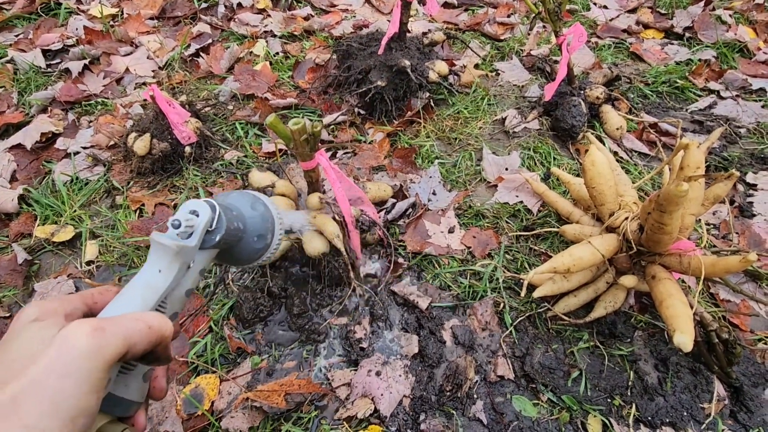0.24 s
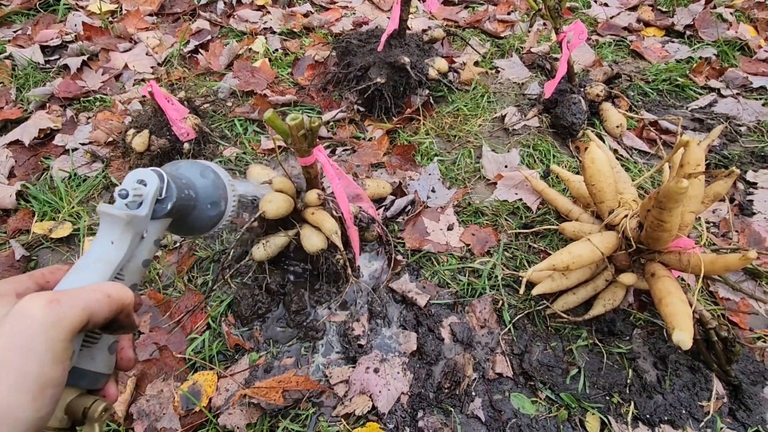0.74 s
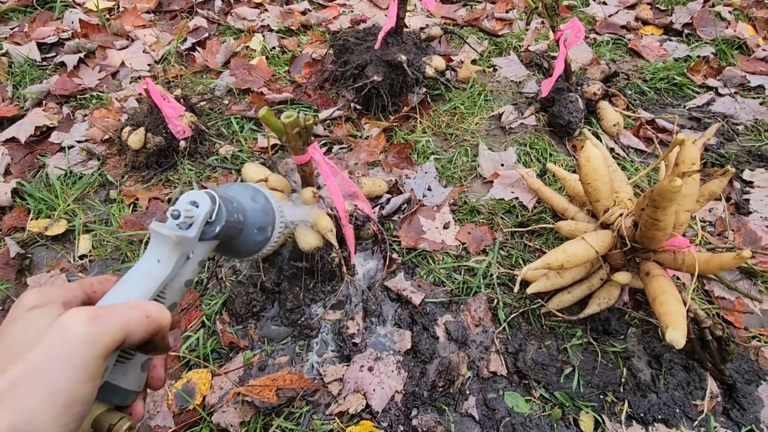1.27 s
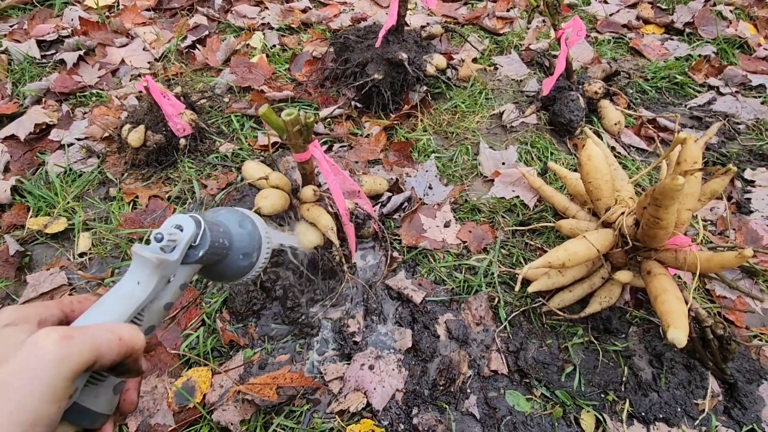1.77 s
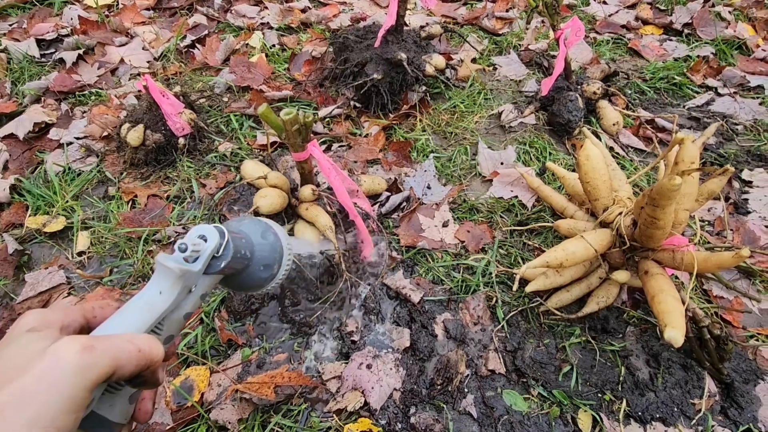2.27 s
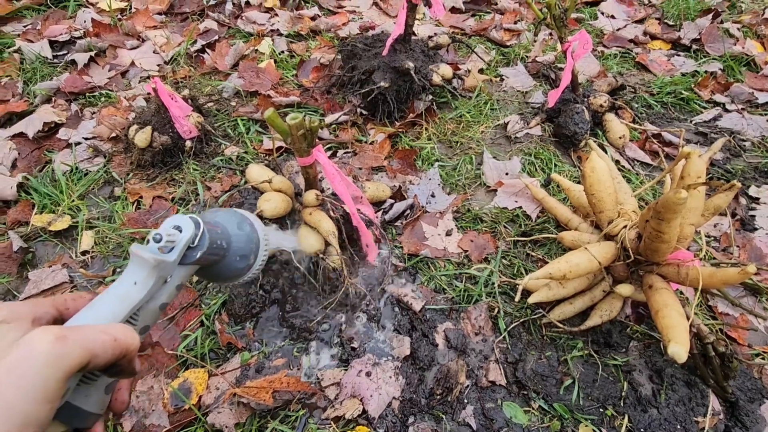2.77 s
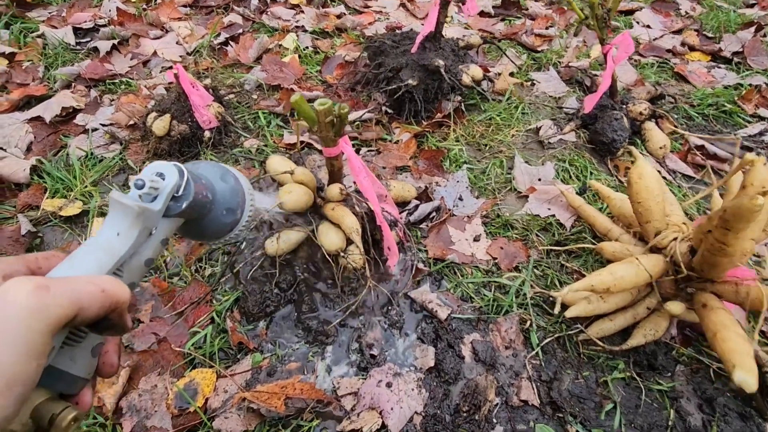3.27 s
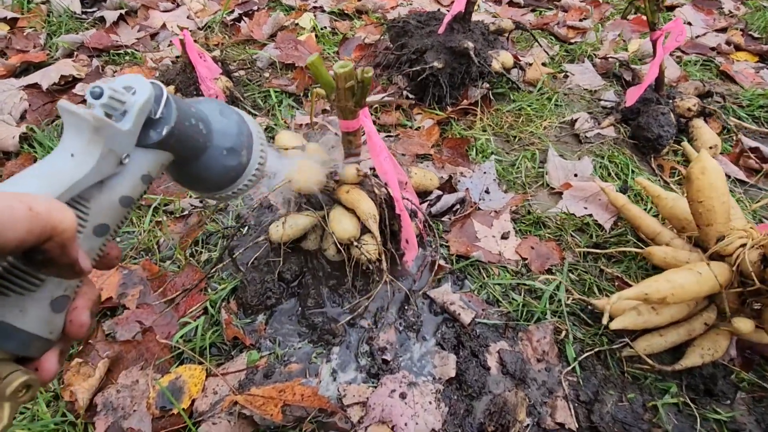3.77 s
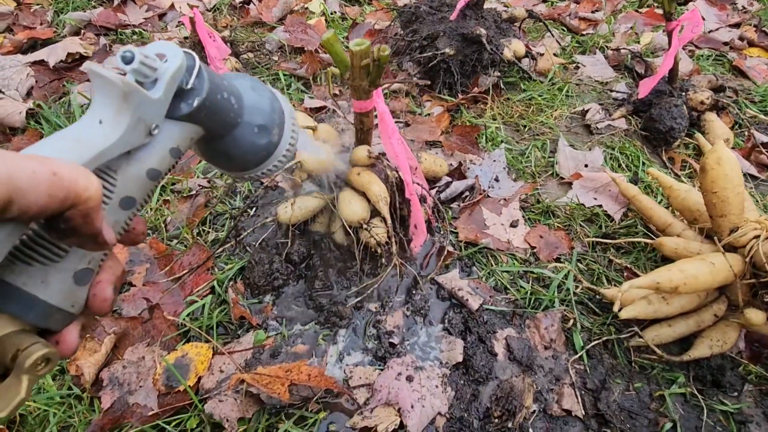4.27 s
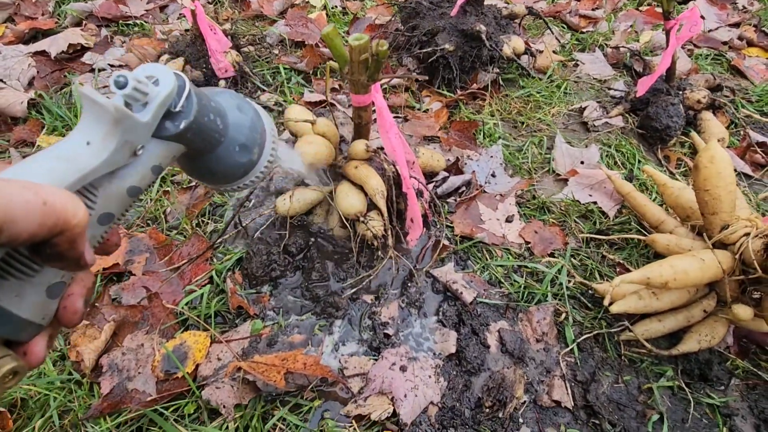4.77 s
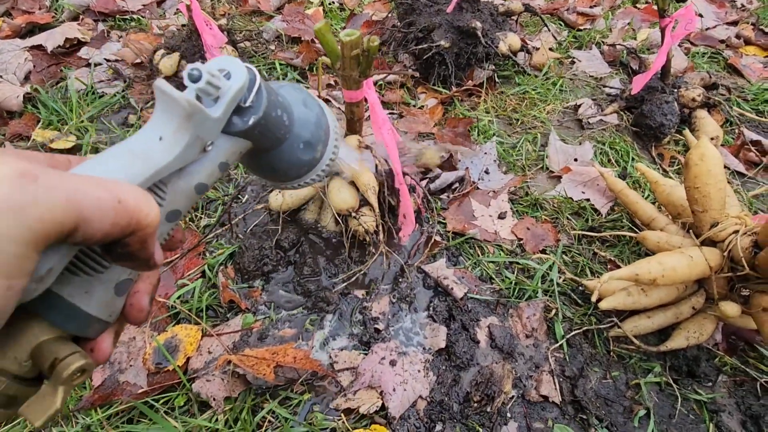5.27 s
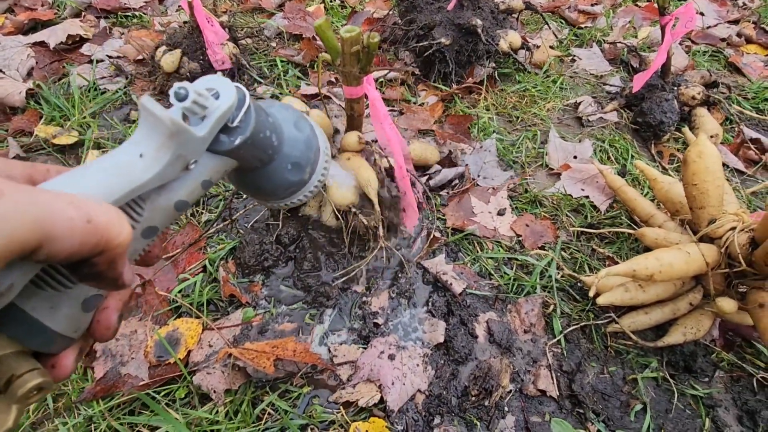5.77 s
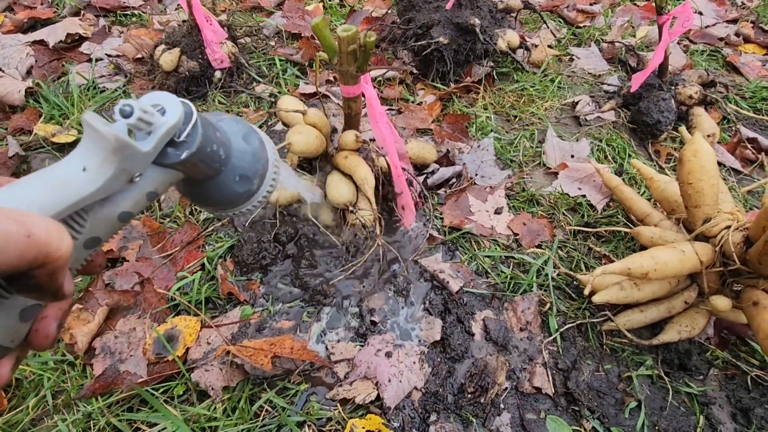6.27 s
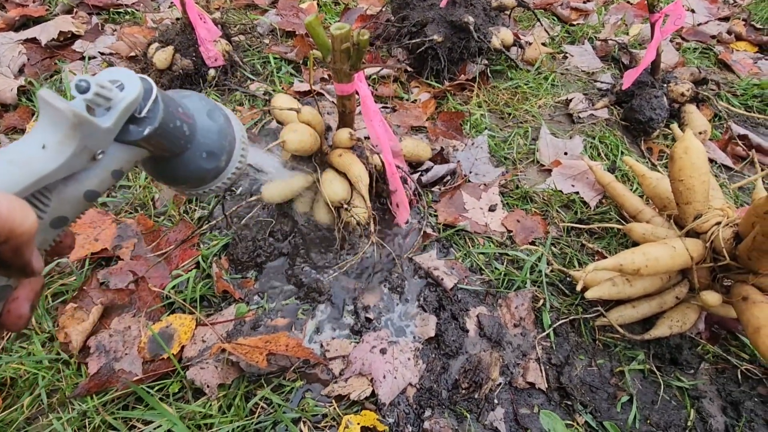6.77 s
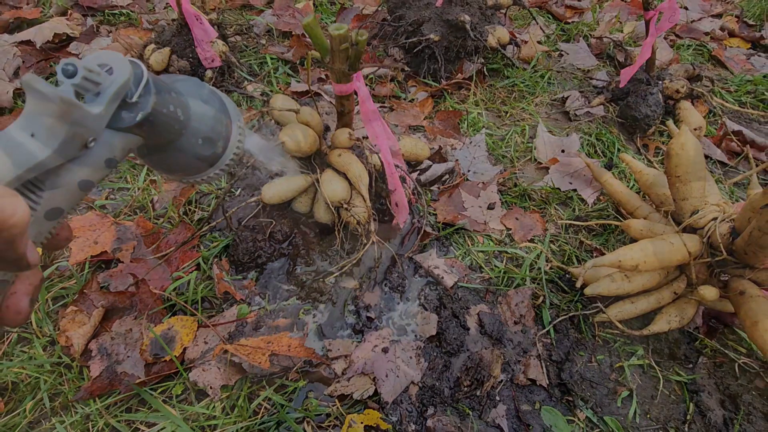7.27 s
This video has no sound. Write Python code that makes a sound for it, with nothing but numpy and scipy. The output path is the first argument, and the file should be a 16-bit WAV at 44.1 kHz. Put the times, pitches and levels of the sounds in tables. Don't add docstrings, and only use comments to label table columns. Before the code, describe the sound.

From 0 s a garden hose sprays tubers on wet soil close to the microphone: a bright, grainy hiss torn into tiny spatters, with a soft puddle gurgle below. It thins briefly near 0.8 s, then sharp spits snap around 1.0-1.1 and 1.4-1.9 s. A clear bubble plop rings near 1.5 s, with rounder ones around 2.4-2.6 s. About 3-3.6 s the spray weakens while the microphone leans nearer and its colour shifts. From 3.8 s it strengthens, with a dense crackle of spits to 4.4 s, dips near 4.8 s, and returns crisply at 5 s. Between 5.9 and 6.6 s hard spits mix with puddle slaps and a quick cluster of high plops. Faint wind and far traffic rumble swell most near 6.5 s; a thin hum is barely there. After 7 s the spray fades to 7.5 s. Open outdoor space, close stereo, no reverberation.

```python
import sys
import numpy as np
from scipy import signal
from scipy.fft import rfft, irfft, next_fast_len
from scipy.io import wavfile
from scipy.ndimage import uniform_filter1d

SR = 44100
rng = np.random.default_rng(int(sys.argv[2]) if len(sys.argv) > 2 else 0)


def transcribe(signal):
    frames = np.atleast_2d(signal).T
    limited = np.clip(frames, -1, 1)
    pcm = np.round(limited * 32767).astype(np.int16)
    wavfile.write(sys.argv[1], SR, pcm)


def volts_from_db(level):
    exponent = np.asarray(level, float) / 20
    return 10 ** exponent


N = 331632
STEPS = np.arange(0, N / SR, .005)


def unit(x):
    return x / np.sqrt(np.mean(x ** 2) + 1e-20)


def along(points, hz):
    f, v = np.transpose(points)
    return np.interp(np.log(hz + 1), np.log(f + 1), v)


def curves(rows):
    s, *columns = np.transpose(rows)
    return [np.interp(np.arange(N) / SR, s, column) for column in columns]


def smooth(rows):
    return [np.interp(np.arange(N) / SR, STEPS, row) for row in rows]


def bumps(rows):
    tents = [np.outer(rise, np.clip(1 - abs(STEPS - s) / half, 0, 1)) for s, half, *rise in rows]
    return smooth(sum(tents))


def wobble(rate):
    return np.interp(np.arange(N) * rate / SR, np.arange(N // 20), rng.standard_normal(N // 20))


def filtered(x, response):
    m = next_fast_len(N + 8192)
    return irfft(rfft(x, m) * response(np.fft.rfftfreq(m, 1 / SR)), m)[..., :N]


def band(hz, low_hz, high_hz):
    return 1 / np.sqrt((1 + (low_hz / (hz + 1)) ** 30) * (1 + (hz / high_hz) ** 30))


def parts(x, *bands):
    hz, t, z = signal.stft(unit(x), SR, nperseg=512)
    at = np.minimum(t * SR, N - 1).astype(int)
    gain = sum(unit(band(hz, low, high))[:, None] * volts_from_db(db[at]) for low, high, db in bands)
    return signal.istft(z * gain, SR, nperseg=512)[1][:, :N]


def torn(size, patch_db, spurt_db, surge_db, drops, bins):
    z = signal.stft(rng.standard_normal((2, N)), nperseg=size)[2]
    shape = z.shape[1:]
    field = uniform_filter1d(rng.standard_normal(shape), size=bins, axis=0)
    field = uniform_filter1d(field, size=2, axis=1)
    burst = (rng.random(shape) < .003) * rng.random(shape)
    for _ in range(2):
        burst = uniform_filter1d(burst, size=bins, axis=0)
    patches = volts_from_db(patch_db * unit(field)) + drops * burst * bins
    pair = signal.istft(z * patches, nperseg=size)[1][:, :N]
    surge = wobble(70) + 0.76 * wobble(15)
    return pair * volts_from_db(spurt_db * wobble(350) + surge_db * surge)


def grains(s, gain, hz, life, rise):
    t = np.arange(700) / SR
    u = t / life[:, None]
    phase = 2 * np.pi * hz[:, None] * t * (1 + rise * np.minimum(u, 4) / 8)
    wave = gain[:, None] * u * np.exp(1 - u) * np.sin(phase)
    at = (s * SR).astype(int)[:, None] + np.arange(700)
    return np.bincount(at.ravel(), wave.ravel(), N + SR)[:N]


# f/Hz, level/dB per Hz
RUMBLE_SPECTRUM = [(13, -37), (22, -0.5), (43, -1), (65, 3.5), (200, -11.5), (260, -38), (440, -120)]
# t/s, level/dB
HUM_LEVEL = [(0, -75), (2.9, -81), (3.2, -62.5), (6.8, -73), (7.52, -78)]
# t/s, half length/s, rumble rise/dB, murmur rise/dB
WIND_GUSTS = [
    (0.45, 0.38, -1, 7),
    (2.76, 0.22, 0, 1),
    (3.06, 0.16, -5, 7.5),
    (4.23, 0.23, 3.5, 9),
    (4.8, 0.27, 0, 6),
    (5.8, 0.94, 3.5, 0.5),
    (6.55, 0.45, 10, 5.5),
    (7.05, 0.37, 4.5, 2.5),
]
CALM_DB, HUM_HZ = -56.5, 340


def air():
    low = unit(filtered(rng.standard_normal((2, N)), lambda hz: volts_from_db(along(RUMBLE_SPECTRUM, hz))))
    rumble = np.array([1.17 * (low[0] + .21 * low[1]), .85 * (low[0] - .2 * low[1])])
    rumble_db = CALM_DB + bumps(WIND_GUSTS)[0] * (1 + .25 * wobble(8))
    hum = np.sin(2 * np.pi * np.cumsum(HUM_HZ + 1.59 * wobble(2)) / SR)
    return volts_from_db(rumble_db) * rumble + volts_from_db(curves(HUM_LEVEL)[0]) * hum


# t/s, level/dB, coarseness of the drops/dB
JET_STRENGTH = [(0.0, -30.5, -6.0), (0.4, -34, -3), (0.55, -30.5, -11.5), (0.84, -42.5, 1),
                (1.11, -31.5, -0.5), (1.69, -32.0, -6), (2.76, -33.5, -8.5), (3.0, -34.0, 0),
                (3.3, -39.0, -4), (3.73, -35.5, -6.5), (3.78, -31.0, -10.5), (4.23, -30, -10.0),
                (4.63, -34, -1), (4.8, -38.5, -1.0), (4.94, -36.5, -10), (4.98, -30.5, -11.5),
                (6.69, -32, -6.5), (7.52, -45.0, -3.5)]
# t/s, half length/s, fine spray/dB, coarse spray/dB
ROOT_GLANCES = [(0.68, 0.06, -2, 4.5), (0.8, 0.07, 6, 0), (1.01, 0.12, 2, -7), (1.17, 0.067, -3.5, -5),
                (1.31, 0.16, 1.0, -7.5), (1.67, 0.12, -1.5, -4), (1.96, 0.06, 2, 0),
                (2.0, 0.058, 0.5, -3.5), (2.12, 0.05, -1, -6.5), (2.76, 0.075, 2.5, 3.5),
                (3.4, 0.05, 3, 4.5), (3.54, 0.08, 5, 3.5), (3.75, 0.062, -4.5, 3.0), (4.64, 0.06, 3, 3.5),
                (5.02, 0.23, -2, 6), (5.22, 0.09, 3, 0), (5.52, 0.042, 2.5, 7.5), (5.79, 0.1, -4.5, 5.5),
                (5.99, 0.051, 3, 0.5), (6.13, 0.04, -0.5, 5.5), (6.2, 0.068, -2, 1.5), (6.42, 0.17, 1, 3.5),
                (6.97, 0.16, -3.5, 2), (7.17, 0.099, -0.5, 5)]


def jet():
    strength_db, coarse_db = curves(JET_STRENGTH)
    fine_up, coarse_up = bumps(ROOT_GLANCES)
    water = torn(size=64, patch_db=2.5, spurt_db=1.15, surge_db=.7, drops=2.4, bins=7)
    fine = (6100, 17000, strength_db + fine_up + 1.33)
    coarse = (2650, 6100, strength_db + coarse_db + coarse_up + 4.0)
    return parts(water, fine, coarse)


# t/s, length/s, slap level/dB, gurgle over slap/dB
PUDDLE_CROSSINGS = [(0.027, 0.29, -49, -6), (0.443, 0.046, -47, -13.5), (1.097, 0.16, -51, -9.5),
                    (1.456, 0.22, -51.5, -6), (1.78, 0.37, -50, -7), (2.252, 0.016, -45.5, -15.5),
                    (2.37, 0.029, -45, -2.5), (2.48, 0.24, -46.5, 0.5), (2.86, 0.2, -45.5, -22),
                    (3.036, 0, -47.5, -3), (3.103, 0.04, -61.5, 14), (3.43, 0.28, -55.0, -4),
                    (3.98, 0.23, -49.5, -7.5), (4.29, 0.23, -50.5, -7.5), (4.66, 0, -41, -1.5),
                    (4.756, 0.28, -50.5, 4), (5.176, 0.21, -56, -1.5), (5.518, 0.22, -51, -3.5),
                    (5.87, 0.0, -43.5, -3.5), (5.96, 0.0, -44.5, -11), (6.11, 0.23, -44.5, -11),
                    (6.398, 0.092, -41.5, -6.5), (6.657, 0.22, -53, 0), (7.0, 0.047, -43.5, -9),
                    (7.03, 0.02, -49.5, 0), (7.133, 0.14, -44, -8.5), (7.29, 0.09, -49.5, -5.5)]
DIP_IN_S, DRAIN_S = 0.12, 0.069
TRICKLE_DB, TRICKLE_GURGLE_DB = -53, -57


def wetness():
    power = volts_from_db([[2 * TRICKLE_DB], [2 * TRICKLE_GURGLE_DB]])
    for s, length, db, deep_db in PUDDLE_CROSSINGS:
        enter = np.clip((STEPS - s) / DIP_IN_S + 1, 0, 1)
        drain = np.exp(-np.maximum(STEPS - s - length, 0) / DRAIN_S)
        power = power + volts_from_db([[2 * db], [2 * (db + deep_db)]]) * (enter * drain) ** 2
    return smooth(10 * np.log10(power))


# t/s, peak level/dB, f/Hz
CLEAR_PLOPS = [(0.106, -22, 2100), (1.502, -35, 2200), (1.534, -19, 2120), (1.565, -27, 2230),
               (1.782, -28, 1360), (2.357, -21.5, 1230), (2.443, -27, 1910), (2.616, -18, 1240),
               (2.895, -34, 2140), (3.059, -25, 1340), (3.124, -30, 716), (3.668, -40, 1910),
               (5.04, -35, 627), (5.521, -34, 1950), (5.957, -34, 1900), (6.115, -24.5, 1810),
               (6.243, -23.5, 1860), (6.263, -22, 1960), (6.289, -20, 2010), (6.35, -37, 2040),
               (6.391, -21, 1870), (6.966, -26, 1860)]
# t/s, share/0-1
LEAN_IN = [
    (0, 0),
    (3.05, 0),
    (3.4, 1),
    (7.52, 1),
]
MURMUR_DB = -62.5


def pool():
    slap_db, gurgle_db = wetness()
    lean = curves(LEAN_IN)[0]
    water = unit(torn(size=256, patch_db=1.5, spurt_db=0.36, surge_db=1.0, drops=0.86, bins=6))
    draw = rng.random((2, 900, 3))
    for side, (when, pitch, size) in zip(water, draw.transpose(0, 2, 1)):
        hz = 750 * 3.5 ** pitch
        bubbles = grains(when * N / SR, (size + 0.02) ** -.4, hz, 2.78 / hz, rise=0.27)
        side += 0.13 * unit(bubbles)
    slap = (1140, 2650, slap_db + 10.0 - 1.14 * lean)
    gurgle = (440, 1140, gurgle_db + 13.0 - 4.0 * lean)
    murmur = (160, 440, MURMUR_DB + bumps(WIND_GUSTS)[1] + 18.5 - 4 * lean)
    s, db, hz = np.transpose(CLEAR_PLOPS)
    plop = grains(s, volts_from_db(db + 2.5), hz, 1.1 / hz + 0.00071, rise=0.17)
    return parts(water, slap, gurgle, murmur) + np.array([plop, 0.1 * plop])


# t/s, peak level/dB, centre f/Hz
LOUD_SPITS = [(0.0547, -18, 8320), (0.995, -13, 7630), (1.1007, -11, 7240), (1.4508, -12, 4670),
              (1.5943, -9.5, 11500), (1.9385, -11.5, 5520), (3.4062, -13, 8910), (3.8774, -8, 13200),
              (3.9998, -9, 13100), (4.1155, -12, 11500), (4.1647, -9.5, 7550), (4.182, -8, 14000),
              (4.222, -16, 7560), (4.239, -10, 13200), (4.294, -11, 11500), (4.3131, -14, 7600),
              (4.3425, -12.5, 7540), (4.9826, -14, 5600), (5.023, -8, 5670), (5.1554, -11, 8010),
              (5.2215, -13, 7570), (5.6333, -8, 14500), (5.9813, -9, 14600), (6.0496, -11, 9090),
              (6.2617, -9, 8240), (6.356, -11.5, 8050), (6.4113, -8.5, 5570), (6.4665, -10, 7750),
              (6.507, -11, 14300), (6.6253, -13, 5510)]
# t/s, peak level/dB, centre f/Hz
LESSER_SPITS = [(0.1376, -17, 14500), (0.165, -18, 12900), (0.4614, -16, 7540), (0.5252, -17, 7620),
                (0.7522, -20, 5060), (1.1598, -19, 5350), (1.2166, -16, 7430), (1.6616, -18, 11500),
                (1.8542, -15, 7510), (1.8961, -15, 8450), (2.0502, -18, 5050), (2.0752, -17, 12700),
                (2.1241, -19, 8610), (2.2682, -19, 7800), (2.7487, -16, 7350), (2.7844, -16, 8780),
                (2.8184, -18, 5590), (2.8868, -21, 5170), (3.0205, -18, 4660), (3.1527, -20, 5500),
                (3.3762, -21, 5420), (3.6506, -17, 7280), (3.7748, -15, 7360), (3.8944, -16, 7710),
                (3.9744, -14, 7260), (4.0477, -16, 7990), (4.2038, -10, 15000), (4.2664, -16, 7400),
                (4.3734, -16, 7640), (4.3874, -16, 8450), (4.5834, -17, 5610), (4.6089, -21, 6580),
                (4.6089, -15, 5530), (4.6404, -16, 3620), (4.8304, -21, 5510), (5.0419, -17, 5590),
                (5.2334, -14, 7470), (5.2414, -14, 7540), (5.2544, -15, 7920), (5.3632, -17, 13400),
                (5.4154, -16, 7490), (5.443, -15, 13300), (5.5218, -11, 7650), (5.5994, -16, 8180),
                (5.7044, -17, 8190), (5.9, -18, 12200), (5.9409, -15, 7630), (6.0013, -11, 7580),
                (6.125, -15, 8370), (6.3784, -16, 4870), (6.4274, -14, 4880), (6.5234, -14, 14200),
                (6.5894, -13, 14400), (6.6787, -15, 7860), (6.7254, -18, 7620), (6.786, -15, 7460),
                (6.9227, -21, 5380), (6.979, -20, 5320), (7.1367, -22, 4800), (7.1886, -22, 5460)]
SPIT_MS, LESSER_DB = 1.62, 1
SMALL_SPIT_DB, SMALL_LOW_HZ, SMALL_HIGH_HZ = 12, 4900, 14800


def spits():
    out, t = np.zeros((2, N + SR)), np.arange(512) / SR
    hz = np.fft.rfftfreq(512, 1 / SR)
    when, pitch, size = rng.random((40, 3)).T
    jet_db = curves(JET_STRENGTH)[0][(when * N).astype(int)]
    small_db = jet_db + SMALL_SPIT_DB + 6 * (size - .5)
    small = zip(when * N / SR, small_db, SMALL_LOW_HZ * (SMALL_HIGH_HZ / SMALL_LOW_HZ) ** pitch)
    lesser = [(s, db + LESSER_DB, centre_hz) for s, db, centre_hz in LESSER_SPITS]
    u = t * 1000 / (0.33 * SPIT_MS)
    for s, db, centre_hz in [*LOUD_SPITS, *lesser, *small]:
        hump = np.exp(-(np.log((hz + 1) / centre_hz) / 0.19) ** 2)
        colour = (0.42 + hump) * band(hz, 2400, 15500)
        burst = irfft(rfft(rng.standard_normal((2, 512))) * colour) * u * np.exp(1 - u)
        burst = burst / abs(burst).max(axis=1, keepdims=True)
        gain = volts_from_db(db - 1.5 + np.array([[0], [-8]]))
        out[:, round(s * SR):][:, :512] += gain * burst
    return out[:, :N]


# f/Hz, level/dB per Hz
LEFT_HELD_BACK = [(260, -20), (340, -15.5), (430, -20.5), (650, -8), (860, -14.5), (1160, -6),
                  (1680, -10.5), (1980, -1.5), (2150, -4.5), (2450, 0.5), (2670, -11)]
RIGHT_HELD_BACK = [(260, -18), (340, -14), (470, -20), (650, -9.5), (730, -5.5), (1080, -18.5),
                   (1160, -11.5), (1590, -5), (1770, -11.5), (2330, 3), (2670, -10.5)]
# f/Hz, level/dB per Hz
LEFT_LEANING = [(260, -13.5), (340, -14), (430, -12.5), (560, -5), (780, -15.5), (900, -8), (1120, -9.5),
                (1460, 0), (1590, -6), (1940, -4), (2670, -1.5)]
RIGHT_LEANING = [(260, -13), (340, -11.5), (430, -17.5), (560, -7), (690, -7.5), (820, -17.5), (1160, -3),
                 (1380, -10.9), (1680, -8), (1980, -1.5), (2670, 0.5)]
# f/Hz, level/dB per Hz
LEFT_TREBLE = [(2710, -1), (3100, 2.23), (3750, -2), (4130, 3.5), (5120, 1.3), (5560, 5), (5900, -3.5),
               (6800, 1), (7620, 7), (9780, 1.5), (11460, 6), (12100, 2), (14430, 6), (15460, 2.5)]
RIGHT_TREBLE = [(2710, -3), (3270, -2), (3700, -3), (3920, -11), (4150, -1.5), (4520, 2), (5640, -5.5),
                (6160, -11.5), (7620, -0.1), (8530, -1), (9430, -10.0), (9600, -1), (10940, -3),
                (11800, 1.5), (13440, 0.5), (15460, -4)]
# f/Hz, width/Hz, held back level/dB, leaning in level/dB
SOIL_ECHO = [
    (454, 38, -12.5, -4),
    (984, 158, -8.5, 1.5),
    (1230, 168, -1.5, -7.5),
]
# f/Hz, coherence/0-1
COHERENCE = [(40, 1), (600, 0.89), (1100, 0.53), (1700, 0.7), (2250, 0.78), (2650, 0.81), (3150, 0.76),
             (3600, 0.84), (3950, 0.6), (4400, 0.82), (5100, 0.47), (6200, 0.2), (8050, 0.58), (9430, 0.46),
             (11370, 0.7), (13000, 0.12)]
# f/Hz, lag/rad
BODY_LAG = [(40, 0), (600, .5), (1000, 1), (1250, 1.55), (1850, 1.4), (2150, 1.95), (2700, 3.14),
            (3350, 4.6), (4350, 9.5), (4950, 11), (5680, 12), (6460, 17.5), (9260, 20.5), (11800, 23.5)]
# t/s, extra right lag round the near side/us, far side/us,
# spread of the water near/ratio, far/ratio (wider is less alike)
JET_AIM = [(0, 13, -12, 1.0, 1.33), (.3, 13, 10, 1.1, 1.0), (.5, 13, 23, 1.1, 1.05), (.58, 50, 44, .8, 1.3),
           (.92, 52, 50, .8, 1.35), (1.0, 40, 42, 1.4, 1.35), (1.1, 14, 5, .95, 1.2),
           (1.8, 12, 6, 1.0, 1.28), (2.0, 8, 20, 1.1, 1.33), (2.2, -12, -10, 1.0, 1.32),
           (2.36, -42, -6, .85, 1.25), (2.66, -48, -14, .9, 1.35), (2.74, 0, 2, 1.1, 1.3),
           (3.0, 20, 32, 1.45, 1.33), (3.2, 28, 40, 1.2, 1.3), (3.45, 42, 30, 1.0, 1.33),
           (3.62, 25, 14, 1.1, 1.35), (3.8, 0, -8, 1.15, .95), (4.0, -12, -11, .95, .9),
           (4.33, -18, -9, .9, .78), (4.6, 0, -11, 1.2, .8), (4.75, 0, -8, 1.2, 1.15),
           (5.05, 0, -10, 1.15, .78), (5.2, -12, -20, .85, .82), (5.4, -40, -38, .8, .9),
           (5.48, -30, -38, 1.3, 1.15), (5.6, -18, -38, .85, .82), (5.72, -22, -40, .9, .82),
           (5.8, -24, -35, 1.4, 1.25), (5.93, -22, -30, .8, .82), (6.05, -5, -15, .9, .85),
           (6.2, 22, -2, .85, .82), (6.4, 6, -9, .62, 1.1), (6.66, 12, 5, .65, 1.25),
           (6.85, 8, -8, 1.1, .85), (7.0, 28, 30, 1.15, 1.32), (7.25, 42, 40, 1.1, 1.35),
           (7.45, 15, 46, .9, 1.35)]
# t/s, left over right level/dB
TREBLE_BALANCE = [(0, -.7), (.7, -.3), (1.2, -1), (2.7, -.7), (3.2, 1.1), (4.2, .9), (4.7, 2), (5.2, -.4),
                  (5.7, -.6), (6.2, .3), (6.8, .6), (7.3, 2.3)]
ROUND_HZ = 3750


def ports(pair):
    hz, t, (a, b) = signal.stft(pair, SR, nperseg=1024)
    hz = hz[:, None]
    s, *aim = np.transpose(JET_AIM)
    near_us, far_us, near_spread, far_spread = (np.interp(t, s, column) for column in aim)
    round_far = 1 / (1 + (ROUND_HZ / (hz + 1)) ** 20)
    lag_us = near_us + round_far * (far_us - near_us)
    spread = near_spread + round_far * (far_spread - near_spread)
    turn = np.arccos(np.clip(along(COHERENCE, hz), 0, 1)) / 2
    turn = np.minimum(turn * spread, np.pi / 4)
    lean = np.interp(t, *np.transpose(LEAN_IN))
    soil_db = 0
    for at, width, back_db, close_db in SOIL_ECHO:
        soil_db = soil_db + (back_db + lean * (close_db - back_db)) * np.exp(-((hz - at) / width) ** 2)

    def colour(back, close, treble):
        return volts_from_db(soil_db + (1 - lean) * along(back + treble, hz) + lean * along(close + treble, hz))

    late = along(BODY_LAG, hz) + 2 * np.pi * hz * lag_us / 10 ** 6
    left = colour(LEFT_HELD_BACK, LEFT_LEANING, LEFT_TREBLE) * (a * np.cos(turn) + b * np.sin(turn))
    right = colour(RIGHT_HELD_BACK, RIGHT_LEANING, RIGHT_TREBLE) * (a * np.cos(turn) - b * np.sin(turn))
    right = right * np.exp(-1j * late)
    balance = volts_from_db(np.interp(t, *np.transpose(TREBLE_BALANCE)) * round_far / 2)
    return signal.istft(np.array([left * balance, right / balance]), SR, nperseg=1024)[1][:, :N]


def scene():
    return ports(jet() + spits() + pool()) + air()


def band_limit(x):
    return signal.sosfilt(signal.butter(12, 15720, fs=SR, output="sos"), x)


def record(dry):
    return band_limit(dry)


dry = scene()
out = record(dry)
transcribe(out)
```